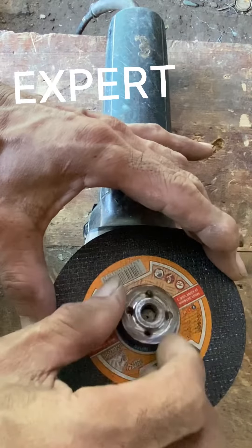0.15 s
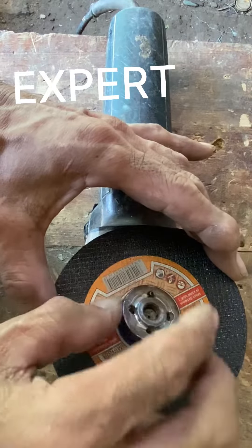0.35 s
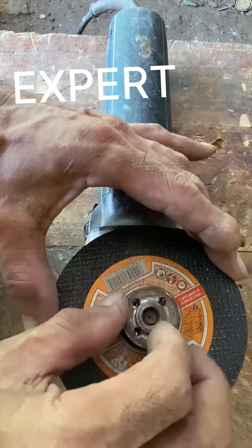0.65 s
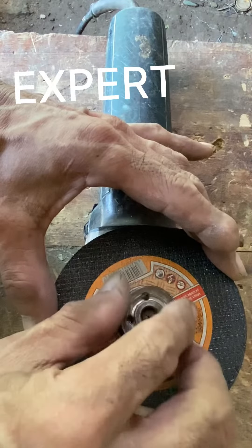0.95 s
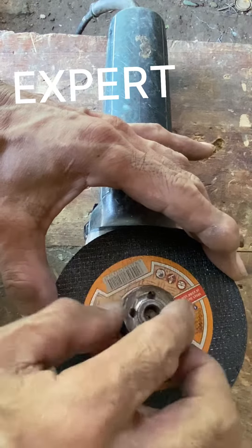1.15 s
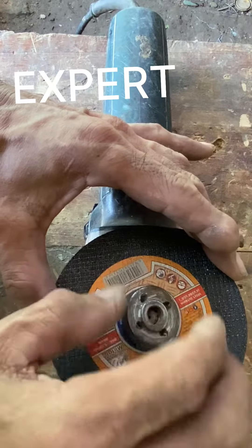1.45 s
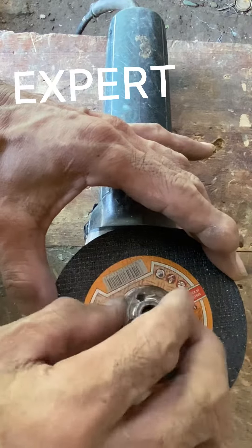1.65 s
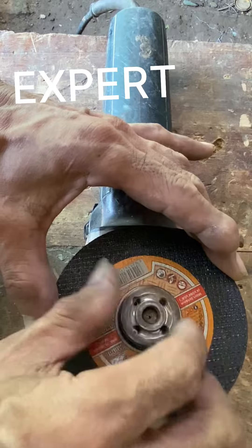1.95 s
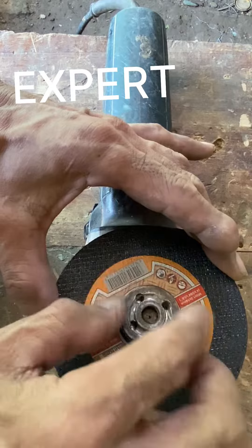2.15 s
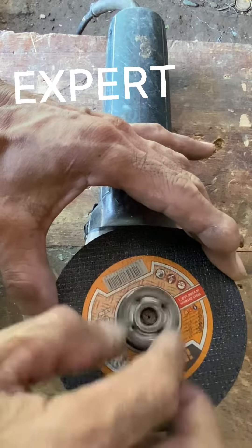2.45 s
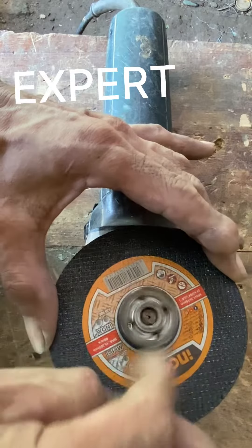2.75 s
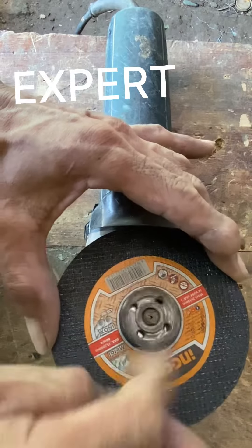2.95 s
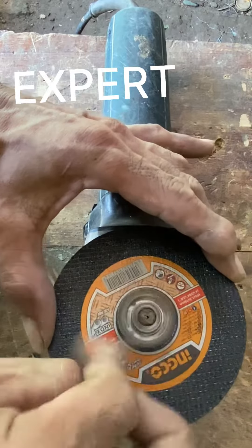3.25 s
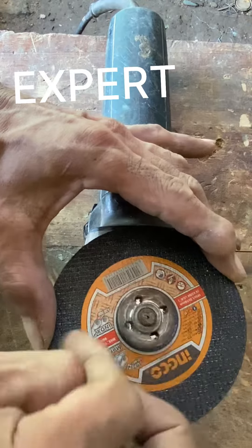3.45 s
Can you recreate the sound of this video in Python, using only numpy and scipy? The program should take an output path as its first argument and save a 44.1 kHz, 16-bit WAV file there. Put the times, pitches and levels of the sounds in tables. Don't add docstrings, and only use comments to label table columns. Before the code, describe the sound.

Metal nut clicks and scrapes along a thread, ringing a tool disc, ending with brief finger squeaks

```python
import sys
import numpy as np
from scipy import signal
from scipy.fft import rfft, irfft
from scipy.io import wavfile

SR = 44100
rng = np.random.default_rng(int(sys.argv[2]) if len(sys.argv) > 2 else 0)


def convert_level_to_amplitude(level_db):
    exponent = np.asarray(level_db, float) / 20
    return 10 ** exponent


def generate_wav(sig):
    pcm = np.round(np.clip(np.atleast_2d(sig).T, -1, 1) * 32767).astype(np.int16)
    wavfile.write(sys.argv[1], SR, pcm)


N = 158760
FREQ = np.fft.rfftfreq(N, 1 / SR)


def rms_one(x):
    return x / np.sqrt(np.mean(x ** 2) + 1e-20)


def at_hz(points, hz):
    table_hz, value = np.transpose(points)
    return np.interp(np.log(hz + 1), np.log(table_hz + 1), value)


def drift(rate):
    r = np.exp(-80 * np.pi * rate / SR)
    slow = signal.lfilter([1], [1, -2 * r, r * r], rng.standard_normal(N // 40 + 2002))[2000:]
    return np.interp(np.arange(N) / 40, np.arange(len(slow)), rms_one(slow))


def resonate(x, hz, width_hz):
    r = np.exp(-np.pi * width_hz / SR)
    poles = [1, -2 * r * np.cos(2 * np.pi * hz / SR), r * r]
    return signal.lfilter([(1 - r * r) / 2, 0, (r * r - 1) / 2], poles, x + 1e-18)


def colour(x, points):
    size = 2048
    gain = convert_level_to_amplitude(at_hz(points, np.fft.rfftfreq(size, 1 / SR)))
    cepstrum = irfft(np.log(gain), size)
    cepstrum[1:size // 2] *= 2
    cepstrum[size // 2 + 1:] = 0
    response = irfft(np.exp(rfft(cepstrum)), size)[:size // 2]
    return signal.fftconvolve(x, response)[:len(x)]


def stroke(length_s, edge_s, size):
    t = np.arange(size) / SR
    return np.clip(t / edge_s, 0, 1) * np.exp(-np.maximum(t - length_s, 0) / edge_s)


def grains(per_s, size):
    chance, strength, sign = rng.random((3, size))
    spread_db = 1.5
    height = convert_level_to_amplitude(-spread_db * np.log(strength + .04))
    return rms_one((chance < per_s / SR) * height * np.sign(sign - .5))


def add(out, s, x):
    i = int(s * SR)
    out[i:i + len(x)] += x[:N - i]


def yard():
    # pitch_hz, level_db
    hiss = [(15, -34), (25, -33), (53, -4), (220, -12), (687, -26), (4990, -38.5), (15200, -49),
            (16500, -60)]
    # pitch_hz, likeness (1 = same on both sides)
    likeness = [(60, 0.74), (180, 0.7), (550, 0.033), (1650, 0.33), (4500, 0.057), (7500, 0.68), (15000, 1)]
    # pitch_hz, left_minus_right_db
    lean = [(60, -1.5), (180, -6.5), (550, 1), (1650, -0.5), (4970, 0.5), (15000, -2.5)]
    # time_s, level_db
    engine = [(0.0, -54), (2.65, -75), (3.6, -57)]
    flicker_db, flicker_per_s, hiss_db = .9, 6, -54.5
    engine_hz, engine_width_hz = 52.6, 10

    out = 0
    edges = 22 * 2 ** np.arange(0, 9.6, .5)
    white = rng.standard_normal((2, 2, N))
    for k, (low, high) in enumerate(zip(edges, edges[1:])):
        band = signal.butter(2, [low, high], "band", fs=SR, output="sos")
        mid, side = signal.sosfilt(band, white[k % 2])
        hz = np.sqrt(low * high)
        alike = np.clip(at_hz(likeness, hz), -1, 1)
        lean_db = at_hz(lean, hz) * np.array([[.5], [-.5]])
        gain = convert_level_to_amplitude(at_hz(hiss, hz) + flicker_db * drift(flicker_per_s) + lean_db)
        out = out + gain * (np.sqrt(1 + alike) * mid + np.sqrt(1 - alike) * side * [[1], [-1]])

    s, db = np.transpose(engine)
    drone = rng.standard_normal(N)
    for _ in range(2):
        drone = resonate(drone, engine_hz, engine_width_hz)
    drone_gain = convert_level_to_amplitude(np.interp(np.arange(N) / SR, s, db))
    return convert_level_to_amplitude(hiss_db) * rms_one(out) + drone_gain * rms_one(drone)


def tool_body(force, s, treble_db, housing_db):
    # pitch_hz, width_hz, level_db
    disc_modes = [(1320, 1020, -10.5), (1610, 620, -13.5), (1863, 530, 10.5), (2745, 688, 13),
                  (2770, 137, 15.5), (3820, 90, -19), (4790, 920, -54), (6520, 520, -7)]
    # pitch_hz, width_hz, level_db
    housing_modes = [(380, 37, -1.5), (707.5, 114.4, 6.5), (802, 175, 3), (945, 39, 2)]
    # pitch_hz, level_db
    crack = [(200, -10), (500, -37), (1500, -11.5), (3200, -8), (4500, -15), (9000, -14.5), (16000, -76)]
    crack_db, mode_spread_db, damping = 3, 2.5, 1.25
    seated_s, loose_db = 2.6, -6

    modes = [(hz, w, db + housing_db) for hz, w, db in housing_modes] + list(disc_modes)
    luck_db = rng.normal(0, mode_spread_db, len(modes))
    force = colour(force, [(1470, 0), (8000, treble_db), (16000, treble_db - 14)])
    out = convert_level_to_amplitude(crack_db) * colour(force, crack)
    for k, (hz, w, db) in enumerate(modes):
        asleep = s < seated_s and 2500 < hz < 3300
        gain = (-1) ** k * convert_level_to_amplitude(db + luck_db[k] + asleep * loose_db)
        out = out + gain * resonate(force, hz, damping * w)
    return out


def knocks():
    # start_s, peak_db, treble_db, housing_db
    hits = [(0.194, -27.5, -50, 20), (0.212, -33, -13, 13), (0.449, -32, -31, 12), (0.503, -29.5, -21, 15),
            (0.519, -14.5, -11, 1), (1.16, -16, -10, 15), (1.169, -11.5, 1, 14), (1.345, -5, 8, 9),
            (1.514, -30, -26, -4), (1.585, -9.5, -12.5, 11), (1.87, -29.5, -26, 15),
            (1.958, -30.5, -10, 20), (2.377, -12.5, -10, -1), (2.423, -17, -13, 11.5),
            (2.451, -1.5, 2.5, 5.5), (2.586, -27, 8, 21.5), (2.631, -7.5, -17, -3), (2.639, -7.5, -4, -3),
            (2.721, -20, -23, -6), (2.78, -20.5, -14.5, 26), (2.809, -21.5, -10, -2), (2.835, -5, -3, 6.5),
            (2.905, 4, -11, -18), (2.97, -4.5, 15.5, 19.5), (3.169, -8, -24, -6), (3.211, -19.5, 6, 26),
            (3.224, -28, -17, 16), (3.257, -12, -22, 4)]
    chatter_s, trim_db = 0.00082, -17.5
    out, t = np.zeros(N), np.arange(4000) / SR
    for s, db, treble_db, housing_db in hits:
        chatter = rng.standard_normal(4000) * t * np.exp(-t / chatter_s)
        x = tool_body(chatter, s, treble_db, housing_db)
        add(out, s, convert_level_to_amplitude(db + trim_db) * x / np.abs(x).max())
    return out


def bench():
    # start_s, length_s, level_db, pitch_hz
    shudders = [(.2, 0.036, -56.5, 101.2), (1.118, 0.12, -53.5, 90.3), (1.361, 0.047, -52, 93.2),
                (1.521, 0.1, -55, 57.7), (1.598, 0.11, -49.5, 94.8), (2.162, 0.098, -57, 102.5),
                (2.449, 0.05, -52.5, 88), (2.598, 0.08, -49, 89.9), (2.81, 0.051, -49, 87.7),
                (2.973, 0.11, -49.5, 93), (3.223, 0.044, -49, 104.5), (3.39, 0.026, -39.5, 84.5)]
    out, t = np.zeros(N), np.arange(12000) / SR
    for s, length_s, db, hz in shudders:
        low, high = 2 * np.pi * (hz * t + rng.random(2)[:, None])
        note = np.sin(low) + 0.19 * np.sin(3.1 * high) + 0.3 * np.sin(1.5 * high)
        add(out, s, convert_level_to_amplitude(db + 4) * note * stroke(length_s, 0.015, size=12000))
    return out * convert_level_to_amplitude(2 * drift(11))


def grates():
    # start_s, length_s, level_db, treble_db, housing_db
    runs = [(0.209, .01, -74, -29, 14.5), (0.922, 0.028, -75.5, -37, 7), (1.168, 0.011, -59, -20.5, -1.5),
            (1.209, 0.029, -67.5, -37, 5), (1.352, 0.015, -65, -25, 4), (1.513, 0.03, -73, -14, 10),
            (1.589, 0.015, -65, -22, 11), (1.655, 0.048, -74.5, -26, 13), (1.869, 0.033, -73.5, -41, 4),
            (2.169, 0.044, -66, -20, 0), (2.454, 0.036, -65, -21, 5.5), (2.642, 0.018, -61, -36, 7.5),
            (2.671, 0.061, -61, -8, 22.5), (2.744, 0.075, -60.5, -46, 20), (2.813, 0.077, -53.5, 3.5, 18.5),
            (2.884, 0.024, -60.5, -11, 7), (2.901, 0.009, -44.5, -6, -4.5), (2.914, 0.013, -49.5, -13, 3.5),
            (3.002, 0.017, -62.5, -21, 2), (3.023, 0.03, -38.5, -10, 1.5), (3.056, 0.02, -48.5, -9, 5.5),
            (3.081, 0.056, -63.5, 5.5, 2.5), (3.196, 0.033, -53, -15.5, 4), (3.234, 0.052, -64, -8, 15)]
    edge_s, swell = 0.00033, 0.25
    size = 9000
    out = np.zeros(N)
    for s, length_s, db, treble_db, housing_db in runs:
        touches_per_s = 2600 * convert_level_to_amplitude(.5 * (db + 45.5))
        force = grains(touches_per_s, size) * stroke(length_s, edge_s + swell * length_s, size)
        x = rms_one(tool_body(force, s, treble_db, housing_db))
        add(out, s, convert_level_to_amplitude(db) * x * np.sqrt(size / SR / length_s))
    return out


def pings():
    # start_s, peak_db, pitch_hz, t60_s
    touches = [(1.1693, -18, 1233, 0.012), (1.1693, -34.5, 3500, .012), (1.1752, -43, 1640, 0.016),
               (1.179, -37, 1190, 0.017), (1.3456, -13.5, 1130, 0.0061), (1.3458, -20.5, 2030, 0.028),
               (1.3455, -31.5, 7560, 0.0054), (1.3553, -24, 1990, 0.0092), (1.3668, -44, 2180, .015),
               (1.515, -50, 2500, .008), (1.5855, -22, 2860, 0.01), (.5195, -46, 3620, 0.0079),
               (3.0332, -20.5, 1360, .02), (3.042, -17, 1470, .02), (3.053, -27.5, 6480, 0.023),
               (3.066, -28, 6440, .015), (2.6392, -26.5, 2880, 0.018), (2.6555, -42, 2170, 0.0053),
               (2.697, -27, 1790, 0.0053), (2.7128, -31, 1990, .008), (2.72, -34.5, 780, 0.057),
               (2.7285, -29, 1770, .006), (2.7805, -35, 1780, 0.011), (2.783, -46, 740, .04),
               (2.809, -36.5, 1360, 0.042), (2.8295, -27, 2560, 0.0054), (2.8435, -20, 1670, .007),
               (2.9062, -7.5, 1920, 0.016), (2.9082, -13.5, 3110, 0.018), (2.9102, -17, 857, .02),
               (2.9122, -8.5, 2980, 0.014), (3.0248, -15, 1980, 0.013), (3.0305, -15, 2940, 0.027),
               (3.0372, -7, 2000, 0.0089), (3.0395, -11.5, 3030, 0.027), (3.0452, -8.5, 2920, 0.019),
               (3.044, -29.5, 380, 0.092), (3.0485, -22.5, 763, 0.048), (3.0635, -18, 1970, 0.017),
               (3.204, -36, 1800, .01), (3.2125, -32, 2400, .008), (3.2585, -44, 1520, .01)]
    rise_s = 0.00032
    out, t = np.zeros(N), np.arange(3000) / SR
    for s, db, hz, t60 in touches:
        envelope = convert_level_to_amplitude(db - 60 * t / t60) * (1 - np.exp(-t / rise_s))
        add(out, s, envelope * np.sin(2 * np.pi * hz * t))
    return out


def rasp():
    # time_s, level_db
    loudness = [(2.36, -88), (2.4, -57), (2.55, -72), (2.61, -53), (2.75, -62), (2.87, -54), (2.95, -48),
                (3.12, -56), (3.28, -60.5), (3.36, -57), (3.449, -83)]
    rub_db, rub_hz = -12.5, 3800
    s, db = np.transpose(loudness)
    ticks = tool_body(grains(1800, size=N), 0, treble_db=-2, housing_db=9.5)
    rub = colour(grains(8200, size=N), [(rub_hz / 2, -20), (rub_hz, 0), (12000, -10), (14000, -30)])
    gain = convert_level_to_amplitude(np.interp(np.arange(N) / SR, s, db))
    return gain * (rms_one(ticks) + convert_level_to_amplitude(rub_db) * rms_one(rub))


def fingers():
    # start_s, length_s, level_db
    slips = [
        (3.293, 0.017, -36),
        (3.365, 0.0114, -49),
        (3.376, 0.0168, -32),
        (3.403, 0.033, -61),
    ]
    # pitch_hz, level_db
    skin = [(400, -13), (1200, 0), (2200, -0.5), (3700, -5), (5800, -1), (10000, -2.5), (13500, -11),
            (15500, -5)]
    sag = 0.62
    out, t = np.zeros(N), np.arange(4000) / SR
    for s, length_s, db in slips:
        hz = 2900 * (sag + (1 - sag) * np.exp(-t / length_s))
        unrest = rms_one(signal.lfilter([1], [1, -.97], rng.standard_normal(4000)))
        squeak = np.sin(2 * np.pi * np.cumsum(hz) / SR) * unrest
        friction = rms_one(colour(grains(22000, size=4000), skin))
        add(out, s, convert_level_to_amplitude(db) * (friction + 0.21 * squeak) * stroke(length_s, 0.002, size=4000))
    return out


def squeaks():
    # start_s, length_s, peak_db, start_pitch_hz
    chirps = [(3.297, 0.0034, -29.5, 3130), (3.3052, 0.0037, -28.5, 2350), (3.312, 0.0037, -39.5, 1180),
              (3.3665, .003, -39, 2370), (3.3785, 0.0066, -21, 2670), (3.3878, 0.0046, -29.5, 1583),
              (3.405, 0.005, -47, 1920)]
    sag_per_s = 38
    out, t = np.zeros(N), np.arange(2000) / SR
    for s, length_s, db, hz in chirps:
        cycles = hz * (1 - np.exp(-sag_per_s * t)) / sag_per_s
        add(out, s, convert_level_to_amplitude(db) * np.sin(2 * np.pi * cycles) * stroke(length_s, 0.00064, size=2000))
    return out


def ports(x):
    # pitch_hz, left_minus_right_db
    shading = [(300, -4.5), (600, 2), (1000, 5), (1600, 6), (2300, 12), (3500, 2), (5500, 5), (8000, -.1)]
    echo_db, echo_t60_s = -18, 0.078
    t = np.arange(8000) / SR
    near = np.array([x, irfft(rfft(x) * convert_level_to_amplitude(-at_hz(shading, FREQ)), N)])
    dull = signal.lfilter([.3], [1, -.7], rng.standard_normal((2, 8000)))
    tail = dull * convert_level_to_amplitude(-60 * t / echo_t60_s) * (t > .004)
    tail = tail / np.sqrt((tail ** 2).sum(axis=1, keepdims=True))
    return near + convert_level_to_amplitude(echo_db) * signal.fftconvolve(near, tail, axes=1)[:, :N]


def scene():
    nut = knocks() + grates() + pings() + rasp()
    hand = fingers() + squeaks()
    around = bench() * convert_level_to_amplitude([[-1.8], [1.8]]) + yard()
    return ports(nut + hand) + around


def band_limit(x):
    return signal.sosfilt(signal.butter(12, 16830, fs=SR, output="sos"), x)


def record(dry):
    # pitch_hz, phase_radians
    port_lead = [(0, 0), (400, .6), (1400, .7), (2100, 2.8), (3100, 2.2), (3500, .5), (5300, 1.5),
                 (5800, 4), (7300, 6.3), (8700, 9.4), (10500, 6.3), (12500, 4.4), (14000, 1.9), (15200, 0)]
    lead = np.interp(FREQ, *np.transpose(port_lead))
    right = irfft(rfft(dry[1]) * np.exp(-1j * lead), N)
    heard = signal.sosfilt(signal.butter(2, 35, "high", fs=SR, output="sos"), [dry[0], right])
    heard = signal.sosfilt(signal.cheby2(10, 50, 16700, fs=SR, output="sos"), heard)
    return band_limit(heard)


dry = scene()
out = record(dry)
generate_wav(out)
```